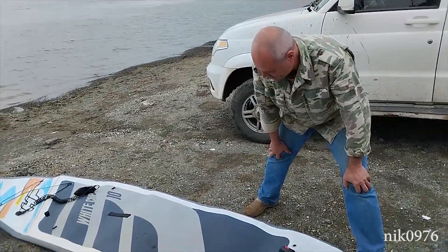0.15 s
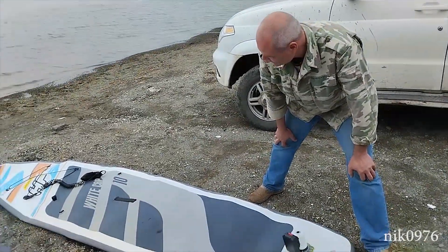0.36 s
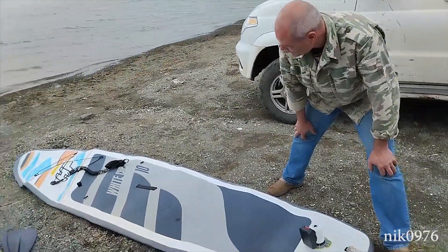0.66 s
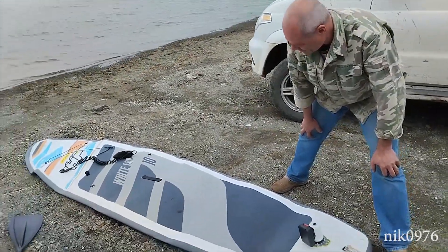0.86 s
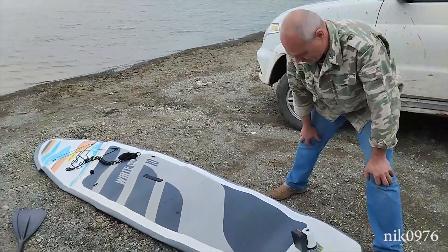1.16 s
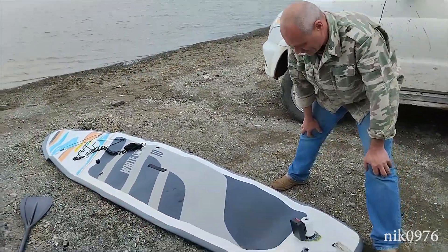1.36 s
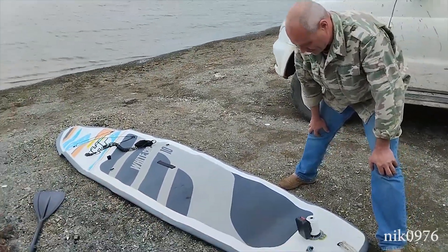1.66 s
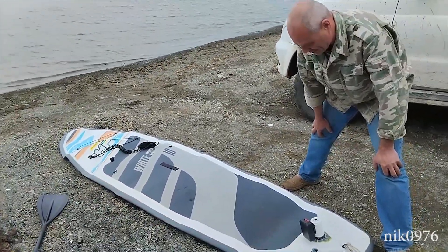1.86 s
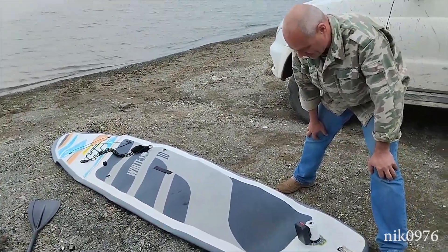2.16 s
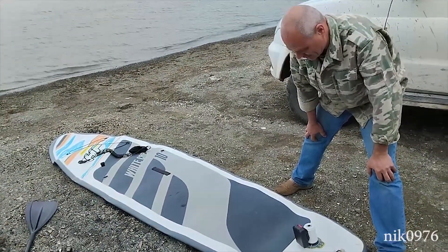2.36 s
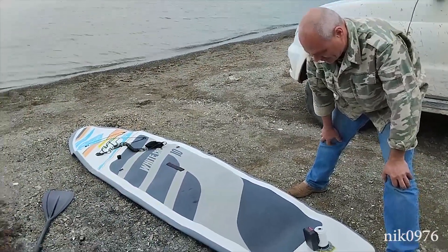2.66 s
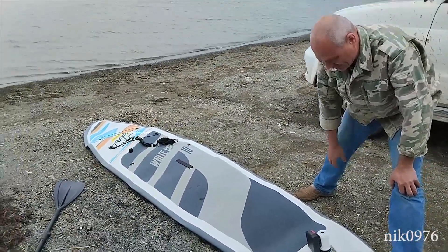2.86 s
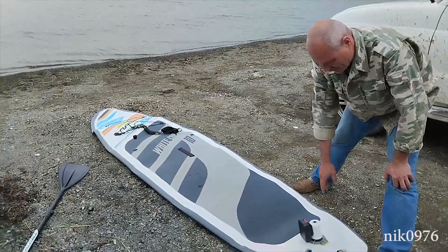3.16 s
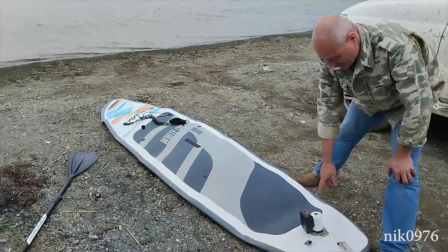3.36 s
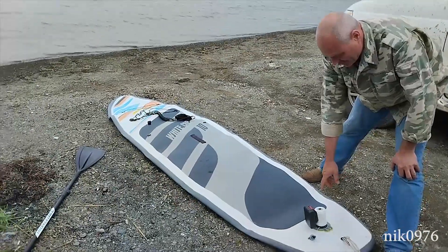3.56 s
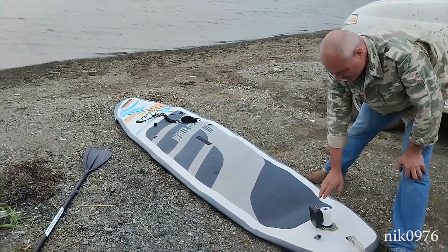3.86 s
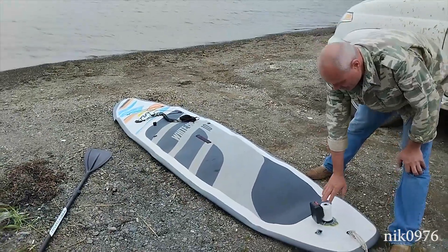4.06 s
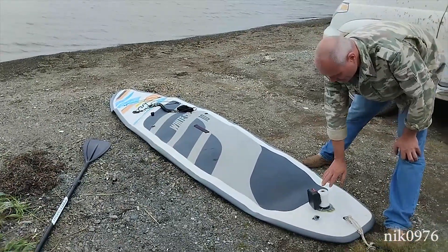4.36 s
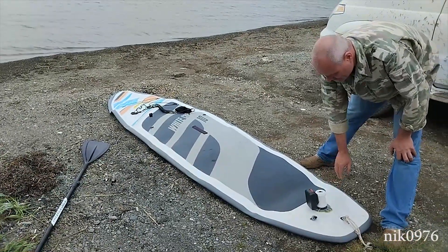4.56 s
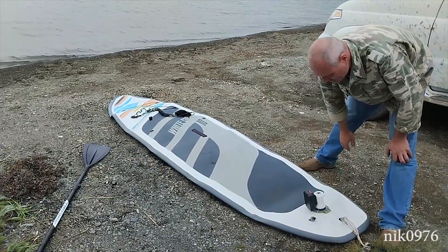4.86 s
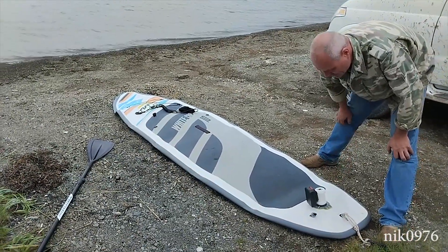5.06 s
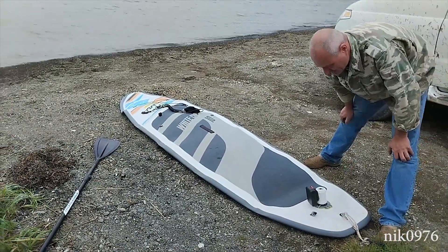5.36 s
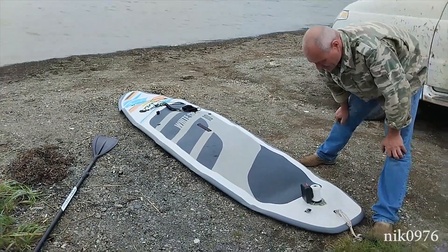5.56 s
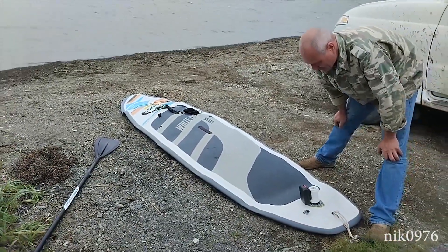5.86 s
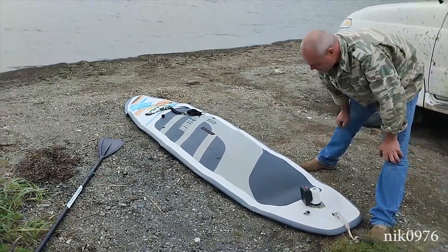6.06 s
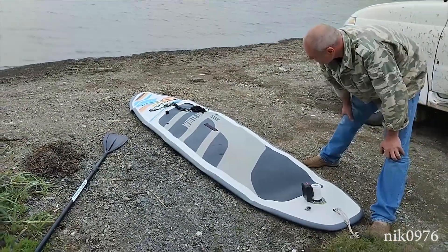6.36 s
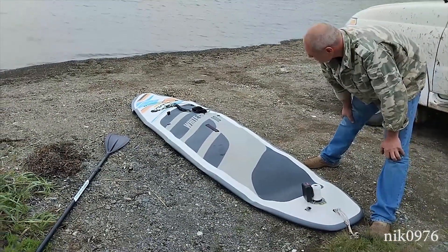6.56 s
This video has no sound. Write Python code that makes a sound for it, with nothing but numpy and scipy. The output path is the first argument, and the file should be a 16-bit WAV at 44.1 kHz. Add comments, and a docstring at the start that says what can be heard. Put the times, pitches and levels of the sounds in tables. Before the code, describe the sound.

A small electric blower whines piercingly high over bright rushing air while wind thumps the microphone on an open lake shore, with one brief air spurt.

```python
"""Lake shore: a small electric blower inflates a paddle board, heard by a slowly circling hand-held microphone.
Shaft-locked tones whine, led by the seven-blade impeller; noise through housing resonances is the rushing air.
Near reflections comb the rush. Once a hand passes the vent and the air spurts: a short burst of coloured noise.
Breezes and buffets rumble on the microphone as banded low noise; a faint steady wash is the shore."""
import sys
import numpy as np
from scipy import signal
from scipy.fft import rfft, irfft, next_fast_len
from scipy.io import wavfile

SR = 44100
rng = np.random.default_rng(int(sys.argv[2]) if len(sys.argv) > 2 else 0)


def store_wav(level_fs):
    """Save 16-bit WAV to argv[1]."""
    pcm = np.round(np.clip(np.atleast_2d(level_fs), -1, 1) * 32767)
    wavfile.write(sys.argv[1], SR, pcm.T.astype(np.int16))


N = 295911
TIME_S = np.arange(N) / SR
FREQ_HZ = np.arange(N // 2 + 1) * SR / N + 1e-3  # offset keeps log and division finite

# steady wash of water and distant air, relative colour [f/Hz, gain/dB]
SHORE_COLOUR = [(20, 1.5), (75, -3), (97, 3.5), (120, -16.5), (215, -4), (270, -7.5), (350, -4),
                (490, -5.5), (620, -9.5), (1000, -7), (2000, -9), (4000, -13.5), (15000, -47)]
SHORE_DB = -46.5

# wind on the microphone at a moderate gust, relative colour [f/Hz, gain/dB]
WIND_COLOUR = [(15, -7), (35, 6), (85, 2), (140, -5.5), (220, -16), (300, -27), (480, -37), (800, -57.5),
               (1600, -84)]
# spells of breeze [start/s, end/s, level/dB]
BREEZES = [(.04, .92, -43.5), (1.63, 2.46, -40), (2.71, 3.29, -34.5), (3.58, 4.186, -45),
           (5.08, 5.721, -33.5), (5.939, 6.697, -41)]
CALM_DB, BREEZE_EDGE_DB_PER_S = -47.5, 147
# single buffets [peak t/s, peak level/dB, time to rise or fall 10 dB/s, tilt/(dB/octave)]
# tilt: small eddies flutter (+), large ones thud (-)
BUFFETS = [(.051, -27.5, 0.049, 4), (.146, -29, 0.018, 2.5), (.272, -31, .055, -0.5),
           (.393, -28.5, 0.044, -1), (0.645, -25.5, 0.016, -1), (.844, -25.5, .06, 1.2),
           (1.701, -30.5, .065, 0.5), (1.833, -22, 0.054, -0.5), (2.107, -26.5, .035, 4.5),
           (2.348, -26, .11, 2.5), (3.005, -19, .058, 2), (3.171, -28.5, .028, -5), (3.514, -29, 0.048, .4),
           (3.703, -30.5, 0.062, -2.5), (3.878, -25.5, 0.026, 1.5), (4.105, -34.5, .05, -4),
           (5.214, -27, 0.036, 2), (5.315, -29, 0.053, 1), (5.497, -25, .049, 2),
           (5.649, -26.5, 0.059, 3.5), (5.944, -29, .055, -2.5), (6.123, -33, .085, -0.5),
           (6.395, -33.5, 0.047, -5)]

# air spurting off the hand, relative colour [f/Hz, gain/dB]
SPURT_COLOUR = [(600, -29), (1500, -11.5), (2500, -4), (3100, -0.5), (3750, 5.5), (4150, -16), (5100, 4),
                (6350, -6), (6900, 2.5), (8800, 9.5), (9800, 4), (10400, -3), (14000, -9), (15500, -6)]
SPURT_START_S, SPURT_HOLD_S, SPURT_DB = 4.495, 0.076, -21
SPURT_RISE_DB_PER_S, SPURT_FALL_DB_PER_S = 112, 300

# air resonances of housing and nozzle, each with its own beam
# [f/Hz, width/Hz, front level/dB, side level/dB, rear level/dB]
HOUSING = [(1580, 610, -57, -50.5, -53), (2440, 1780, -39.5, -41, -43), (3133, 760, -45, -35.5, -43),
           (3590, 1180, -50, -56, -44.5), (4482, 400, -51, -45, -55), (5102, 660, -39.5, -43.5, -46.5),
           (5643, 1300, -42.5, -37, -36), (6480, 1660, -31.5, -47, -42.5), (7930, 2640, -39, -34, -37),
           (9140, 1400, -27, -32.5, -36.5), (10010, 680, -58, -38.5, -59), (11700, 3300, -44, -41.5, -40.5),
           (14650, 4300, -40, -42.5, -44)]
# microphone position [t/s, bearing: 0 front, 1 side, 2 behind]
BEARING = [(0, 0.11), (.95, 0.13), (1.8, 0.81), (2.7, 0.79), (3.3, .99), (4.3, 1.42), (4.75, 2),
           (6.71, 1.83)]
# level change of the rushing air [t/s, gain/dB]
AIR_LEVEL = [(0, 0.3), (.4, 0), (1.3, 0.5), (2, 0), (4.3, -0.15), (6.71, -0.05)]
# extra path of two near reflections as the microphone moves [t/s, deck delay/ms, ground delay/ms]
ECHOES = [(0, .621, 1.009), (1.1, .707, 1.035), (2.2, .728, 1.008), (3.4, .739, .965), (4.3, .7, 1.005),
          (4.75, .62, 1.03), (5.7, .55, .828), (6.71, .535, .838)]
ECHO_SHARE = 0.19
# weak later reflection, likely off a parked car
CAR_ECHO_MS, CAR_DRIFT_MS_PER_S, CAR_SHARE = 9.15, -0.041, 0.17

# shaft speed, sagging and recovering with the load [t/s, turns per second/Hz]
SHAFT_SPEED = [(0.0, 1204), (0.42, 1219), (0.85, 1204), (1.22, 1224), (1.67, 1208), (2.3, 1203.4),
               (2.52, 1196.0), (2.72, 1204), (3.38, 1206), (3.87, 1218), (4.49, 1204.3), (4.55, 1212.2),
               (4.9, 1200), (5.06, 1210), (5.95, 1200), (6.1, 1203), (6.31, 1213.0), (6.71, 1212)]
BLADES, MOTOR_ORDER = 7, 4  # cycles per turn
# blade-passing whine as the microphone moves through its beam [t/s, level/dB]
BLADE_LEVEL = [(0, -20), (.53, -22), (.82, -26.5), (1.8, -32), (2.24, -26), (2.45, -36.5), (2.97, -32.5),
               (3.11, -24), (3.46, -33), (4.04, -25), (4.15, -32), (4.62, -24.5), (5.43, -27), (5.95, -29),
               (6.38, -27), (6.71, -36)]
# brief dips of the whine [t/s, depth/dB]
DIPS = [(.85, -14), (1.27, -13), (4.91, -8), (5.44, -18), (5.93, -13)]
# brief flares of the whine [t/s, lift/dB]
FLARES = [(1.52, 6), (3.85, 6), (4.53, 11.5)]
DIP_HALF_WIDTH_S, FLARE_HALF_WIDTH_S = 0.043, 0.04  # to 1/e of the dB change
# motor tone at four per turn [t/s, level/dB]
MOTOR_FOURTH = [(0.0, -33), (1.18, -36), (1.98, -46.5), (2.88, -46.8), (3.2, -39), (3.31, -48), (3.64, -39),
                (4.28, -45.5), (4.56, -37), (5.71, -46.5), (6.5, -35.2), (6.71, -42.7)]
# motor tone at two per turn [t/s, level/dB]
MOTOR_SECOND = [(0, -45), (.7, -49.5), (1.7, -43), (2.86, -44.5), (3.33, -55), (3.9, -51.5), (5.5, -54),
                (5.95, -50), (6.71, -65)]
# weak shaft tones [multiple of shaft speed]
SHAFT_ORDERS = [1, 5, 8, 9, 10, 13]
# mean level of each weak tone [level/dB]
SHAFT_DB = [-61.5, -46.5, -52, -58, -65, -69]

TOP_HZ = 15750  # recorder cutoff


def undb(db):
    """Decibels to gain."""
    return 10 ** (np.asarray(db) / 20)


def curve(rows, column=1):
    """One table column, interpolated linearly in time."""
    rows = np.array(rows, float)
    return np.interp(TIME_S, rows[:, 0], rows[:, column])


def colour(points):
    """Gain over FREQ_HZ from (f/Hz, gain/dB) points, linear in dB over log frequency."""
    hz, db = np.transpose(points)
    return undb(np.interp(np.log(FREQ_HZ), np.log(hz), db))


def noise(gain):
    """Gaussian noise shaped by a gain over FREQ_HZ, scaled to rms 1."""
    size = next_fast_len(N, True)
    bin_hz = np.arange(size // 2 + 1) * SR / size
    spectrum = rfft(rng.standard_normal(size)) * np.interp(bin_hz, FREQ_HZ, gain)
    x = irfft(spectrum, size)[:N]
    return x / x.std()


def walk(rate_hz):
    """Random wandering of spread 1, mostly slower than rate_hz."""
    return noise(1 / (1 + (FREQ_HZ / rate_hz) ** 2))


def resonance(hz, width_hz, steepness=1.46):
    """Gain of a resonance with steep skirts."""
    detune = (FREQ_HZ ** 2 - hz ** 2) / (FREQ_HZ * width_hz)
    return (1 + 2 * detune ** 2 / steepness) ** -steepness


def reflect(x, delay_ms, share):
    """Direct sound plus one delayed copy, scaled to keep the mean power."""
    fine = signal.resample_poly(x, 4, 1)  # finer grid for fractional delays
    place = 4 * SR * (TIME_S - delay_ms / 1000)
    echo = np.interp(place, np.arange(len(fine)), fine)
    return (x + share * echo) / np.sqrt(1 + share ** 2)


def bumps(rows, half_width_s):
    """Sum of bell-shaped level changes in dB from (t/s, change/dB) rows."""
    return sum(db * np.exp(-((TIME_S - at_s) / half_width_s) ** 2) for at_s, db in rows)


def envelope(start_s, end_s, db, rise_db_per_s, fall_db_per_s):
    """Gain that rises to a level, holds from start to end and dies away, linear in dB."""
    rise_db = rise_db_per_s * np.maximum(start_s - TIME_S, 0)
    fall_db = fall_db_per_s * np.maximum(TIME_S - end_s, 0)
    return undb(db - rise_db - fall_db)


def shore():
    """Soft wash: coloured noise whose level wanders slightly."""
    return undb(SHORE_DB + 0.57 * walk(5.9)) * noise(colour(SHORE_COLOUR))


def wind_strength():
    """Wind level in dB and tilt in dB/octave: calm air, breezes and buffets add in power."""
    power = undb(CALM_DB) ** 2
    for start_s, end_s, db in BREEZES:
        power = power + envelope(start_s, end_s, db, BREEZE_EDGE_DB_PER_S, BREEZE_EDGE_DB_PER_S) ** 2
    tilt = 0
    for at_s, db, fade_s, tilt_db in BUFFETS:
        buffet = envelope(at_s, at_s, db, 10 / fade_s, 10 / fade_s) ** 2
        power = power + buffet
        tilt = tilt + tilt_db * buffet
    return 10 * np.log10(power), tilt / power


def wind(moderate_db=-34, brighten=0.33, knee_hz=110, ceiling_db=-10):
    """Eddies at the microphone port; stronger gusts shed smaller eddies, so the rumble reaches higher."""
    strength_db, tilt_db = wind_strength()
    gust_db = strength_db + 2.7 * walk(38) - 0.8
    shape = colour(WIND_COLOUR)
    rumble = 0
    for hz in 20 * 2.0 ** np.arange(7):  # overlapping bands an octave apart
        band = shape * np.cos(np.pi / 2 * np.clip(np.log2(FREQ_HZ / hz), -1, 1))
        share = np.sqrt(np.sum(band ** 2) / np.sum(shape ** 2))
        octaves_bright = max(np.log2(2 * hz / knee_hz), 0)
        lift_db = brighten * octaves_bright * (gust_db - moderate_db)
        lift_db = lift_db + tilt_db * np.log2(hz / knee_hz)
        rumble = rumble + share * undb(lift_db) * noise(band)
    # port pressure saturates in the hardest gusts
    ceiling = undb(ceiling_db)
    return ceiling * np.tanh(rumble * undb(gust_db) / ceiling)


def spurt():
    """The jet glances off a hand, whose close reflection makes it ring hollow."""
    swell = envelope(SPURT_START_S, SPURT_START_S + SPURT_HOLD_S, SPURT_DB,
                     SPURT_RISE_DB_PER_S, SPURT_FALL_DB_PER_S)
    jet = reflect(noise(colour(SPURT_COLOUR)), delay_ms=1.02, share=0.35)
    return swell * undb(1.0 * walk(60.7)) * jet


def rushing_air():
    """Turbulence rings the housing; the mix of resonances shifts as the microphone moves."""
    bearing = curve(BEARING)
    air = 0
    for hz, width_hz, *beam_db in HOUSING:
        level_db = np.interp(bearing, np.arange(len(beam_db)), beam_db) + 0.5 * walk(5.3)
        air = air + undb(level_db) * noise(resonance(hz, width_hz))
    air = air * undb(curve(AIR_LEVEL) + 0.32 * walk(30))
    # each reflection cuts a comb of notches that slides slowly through the hiss
    air = reflect(air, curve(ECHOES, column=1), ECHO_SHARE)
    air = reflect(air, curve(ECHOES, column=2), ECHO_SHARE)
    return reflect(air, CAR_ECHO_MS + CAR_DRIFT_MS_PER_S * TIME_S, CAR_SHARE)


def whine():
    """Tones locked to the shaft; turbulent inflow shakes the blade tone in level and phase."""
    speed_hz = curve(SHAFT_SPEED) * (1 + 0.000281 * walk(6.3))
    turn_rad = 2 * np.pi * np.cumsum(speed_hz) / SR
    blade_db = curve(BLADE_LEVEL) + bumps(DIPS, DIP_HALF_WIDTH_S) + bumps(FLARES, FLARE_HALF_WIDTH_S)
    inflow = undb(blade_db + 2.0 * walk(57) + 1.0 * walk(13) - 0.44)
    shake_rad = 0.073 * walk(45)
    blade = inflow * np.sin(BLADES * turn_rad + shake_rad)
    fourth = undb(curve(MOTOR_FOURTH) + 1.3 * walk(6.7)) * np.sin(MOTOR_ORDER * turn_rad)
    second = undb(curve(MOTOR_SECOND) + 0.38 * walk(3.3)) * np.sin(2 * turn_rad)
    weak = 0
    for order, db in zip(SHAFT_ORDERS, SHAFT_DB):
        weak = weak + undb(db + 2 * walk(1.8)) * np.sin(order * turn_rad)
    # eddies chopped by the blades spread a noisy skirt round the whine
    skirt = undb(blade_db - 12.5) * noise(resonance(8527, 300))
    return np.sqrt(2) * (blade + fourth + second + weak) + skirt  # sqrt(2): sine peak to rms 1


def scene():
    """Shore, wind and blower, the same in both channels."""
    mono = shore() + wind() + spurt() + rushing_air() + whine()
    return np.array([mono, mono])


def record(dry):
    """Recorder: a steep elliptic low-pass cuts the top."""
    lowpass = signal.ellip(12, 0.1, 90, TOP_HZ, fs=SR, output="sos")
    return signal.sosfilt(lowpass, dry)


dry = scene()
out = record(dry)
store_wav(out)
```